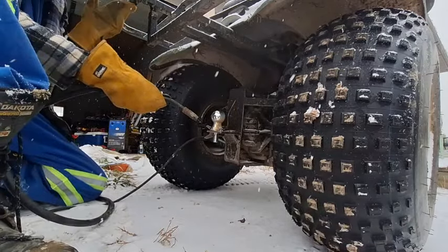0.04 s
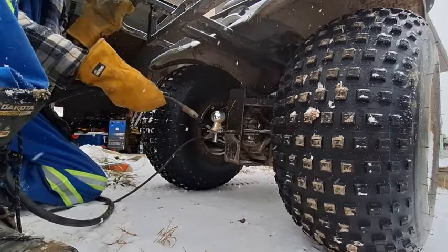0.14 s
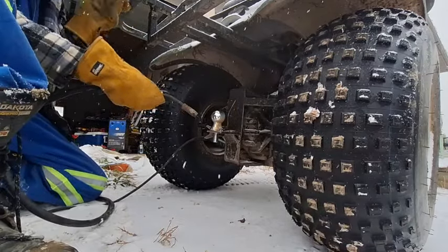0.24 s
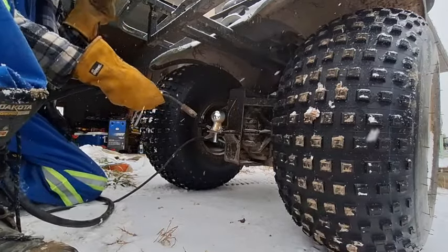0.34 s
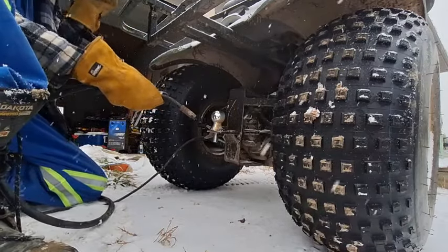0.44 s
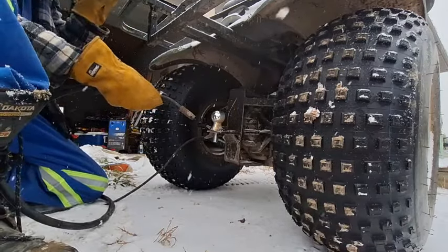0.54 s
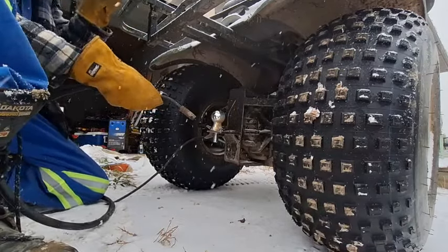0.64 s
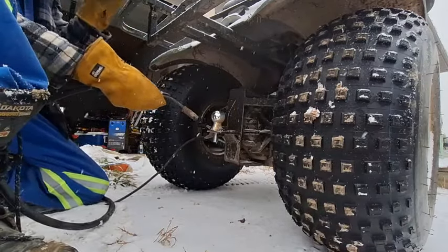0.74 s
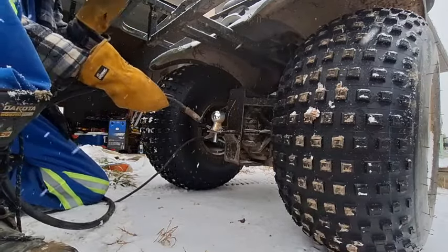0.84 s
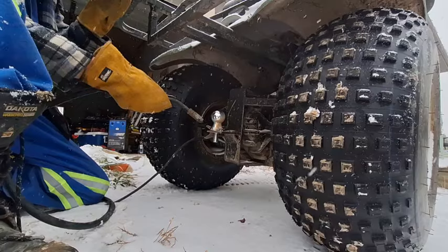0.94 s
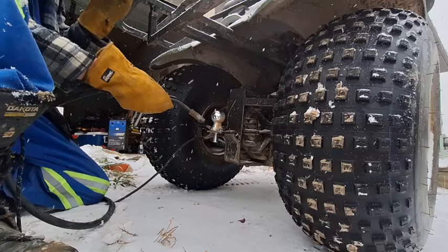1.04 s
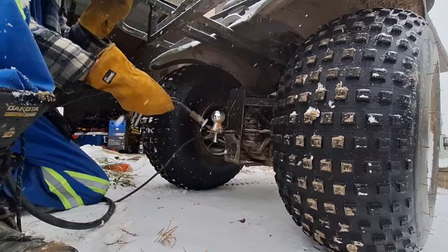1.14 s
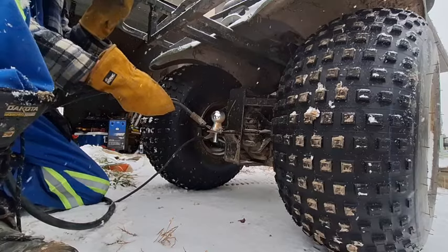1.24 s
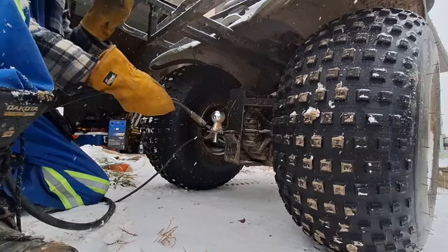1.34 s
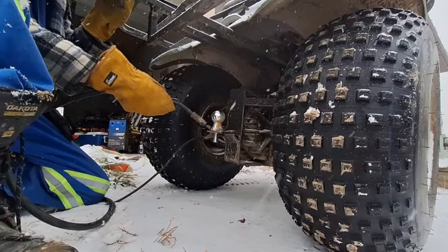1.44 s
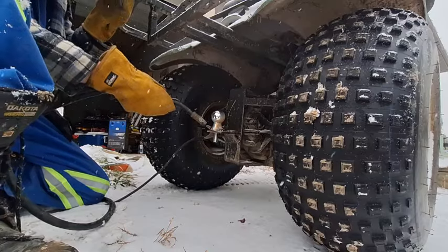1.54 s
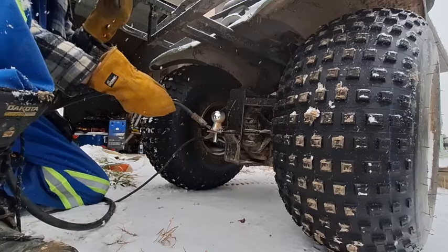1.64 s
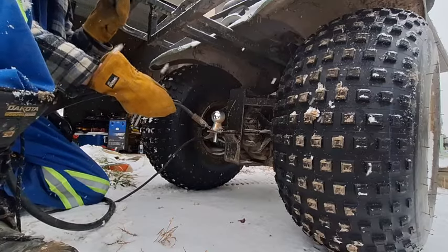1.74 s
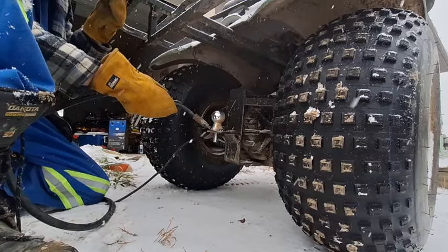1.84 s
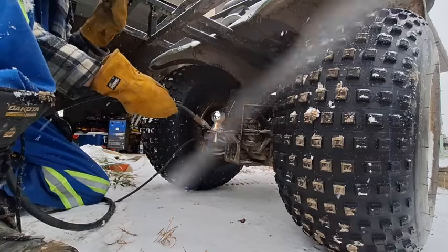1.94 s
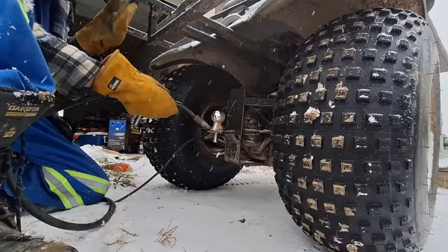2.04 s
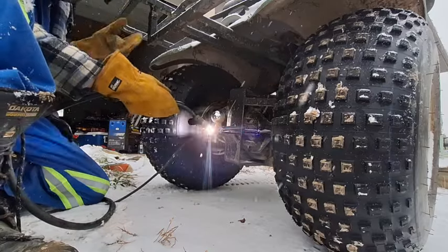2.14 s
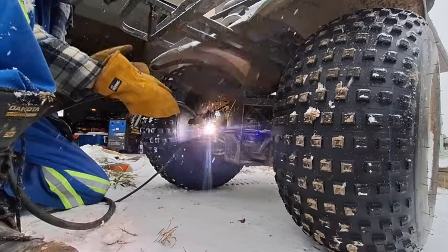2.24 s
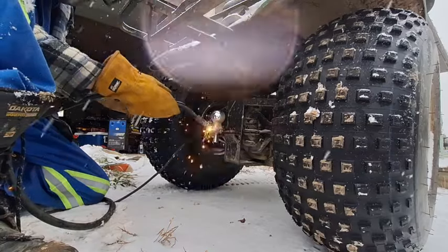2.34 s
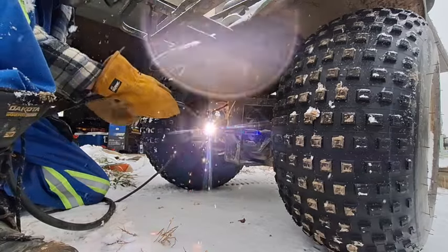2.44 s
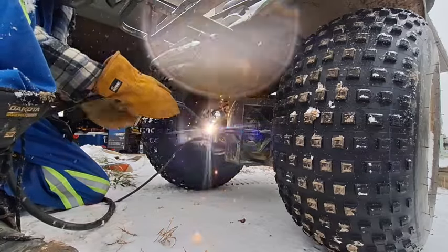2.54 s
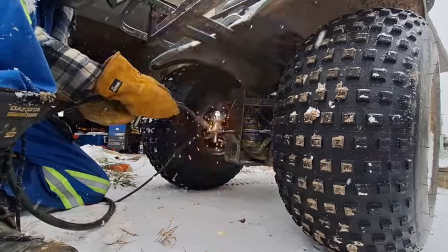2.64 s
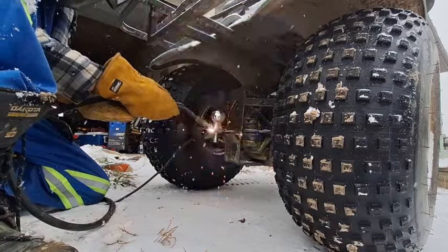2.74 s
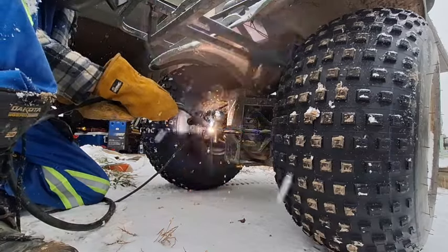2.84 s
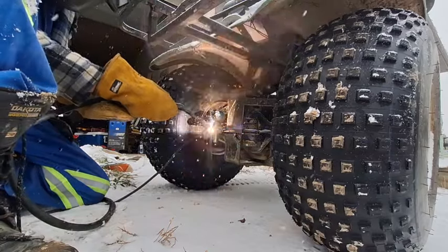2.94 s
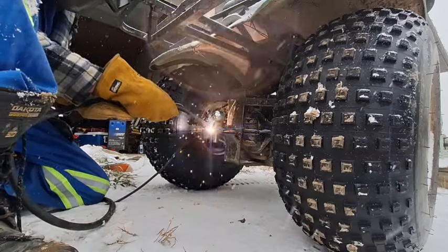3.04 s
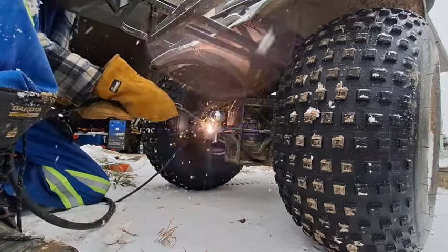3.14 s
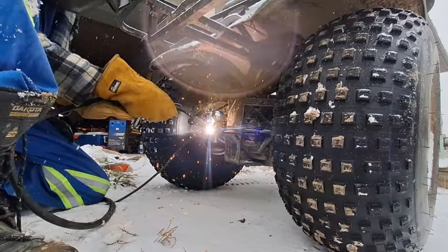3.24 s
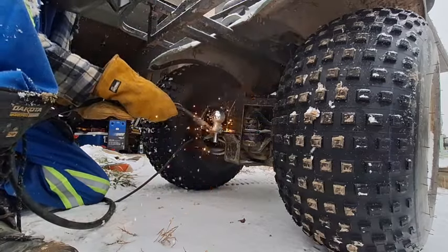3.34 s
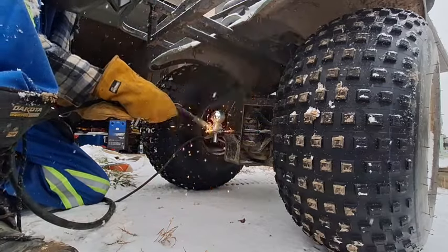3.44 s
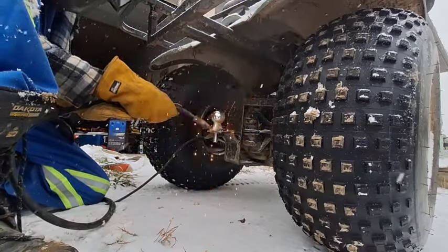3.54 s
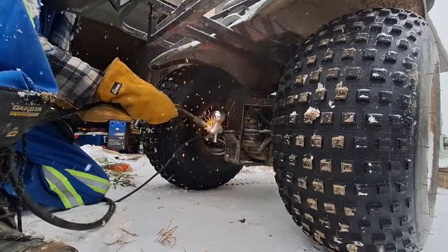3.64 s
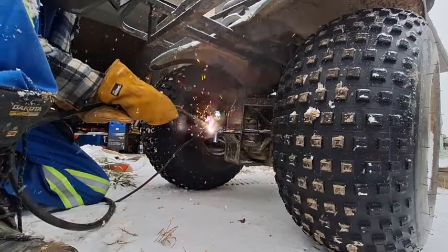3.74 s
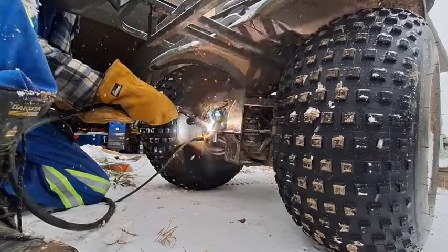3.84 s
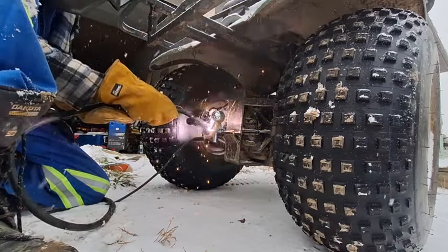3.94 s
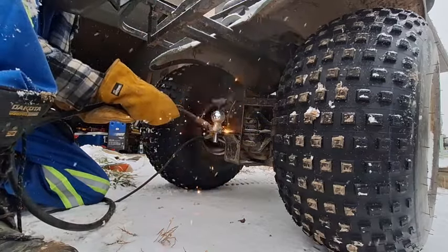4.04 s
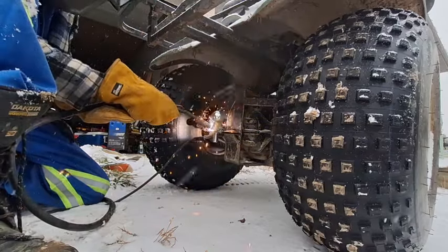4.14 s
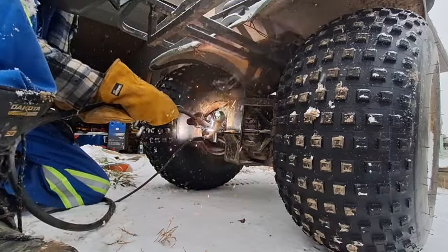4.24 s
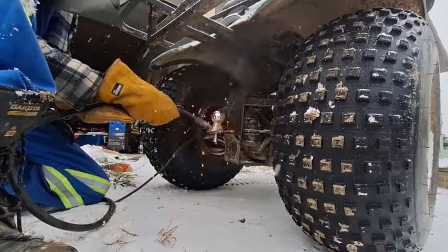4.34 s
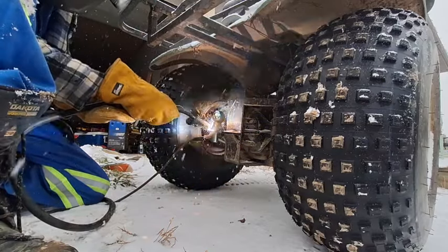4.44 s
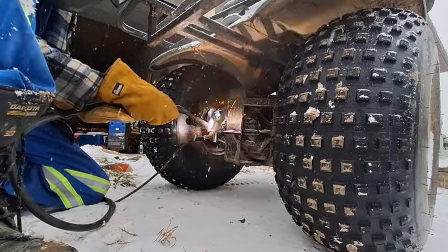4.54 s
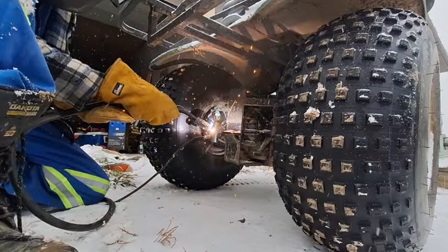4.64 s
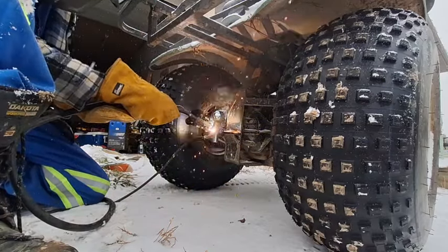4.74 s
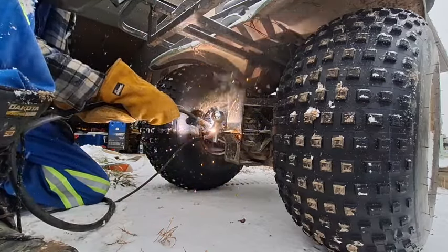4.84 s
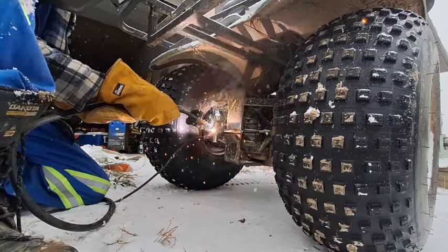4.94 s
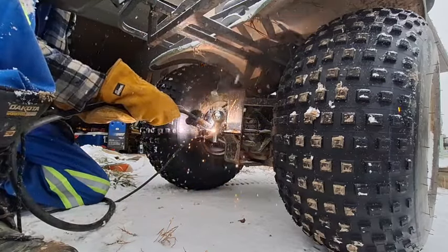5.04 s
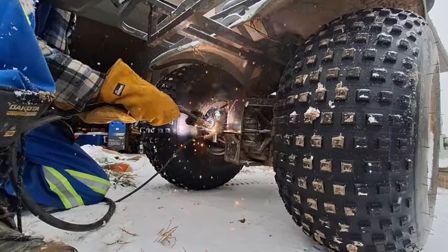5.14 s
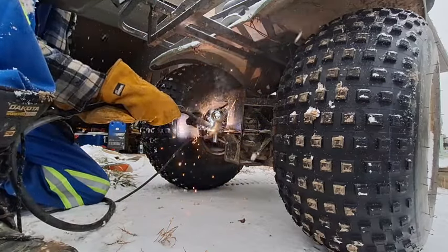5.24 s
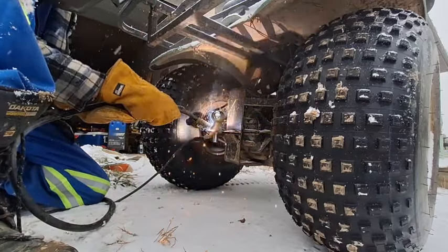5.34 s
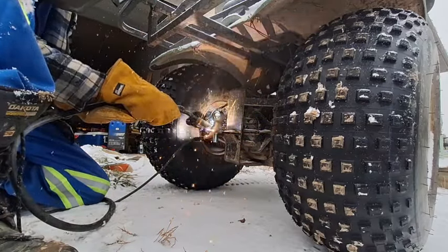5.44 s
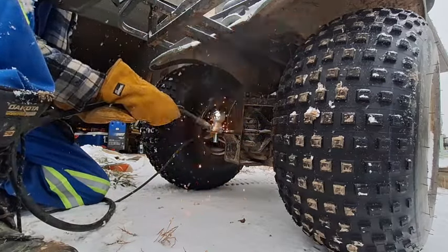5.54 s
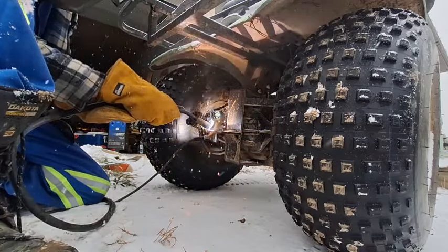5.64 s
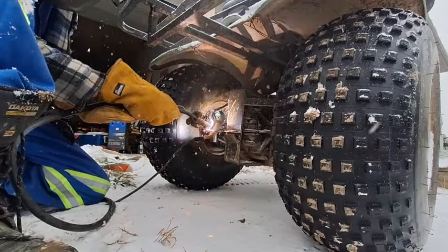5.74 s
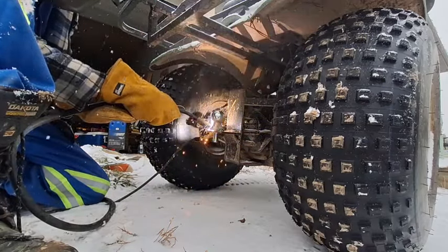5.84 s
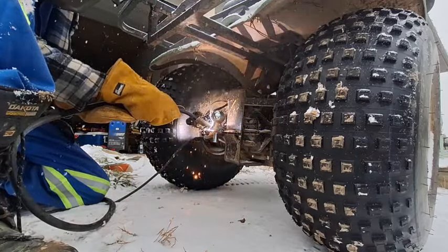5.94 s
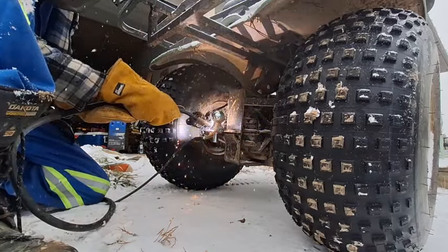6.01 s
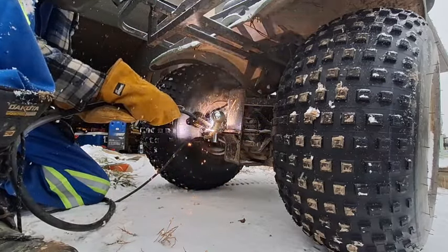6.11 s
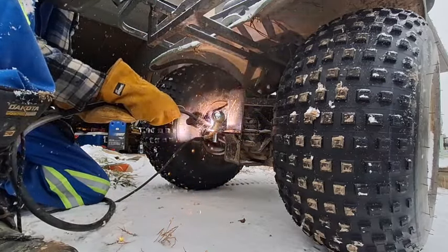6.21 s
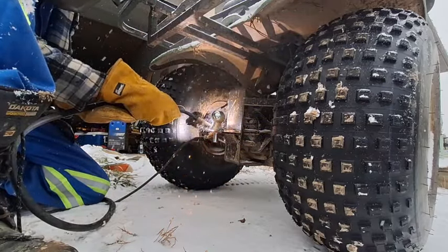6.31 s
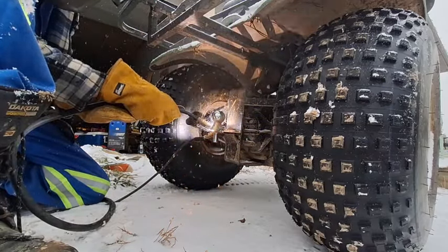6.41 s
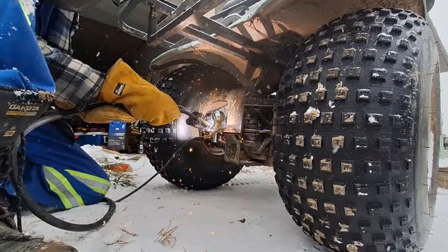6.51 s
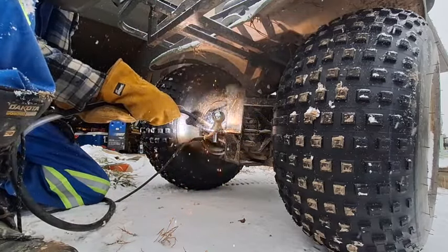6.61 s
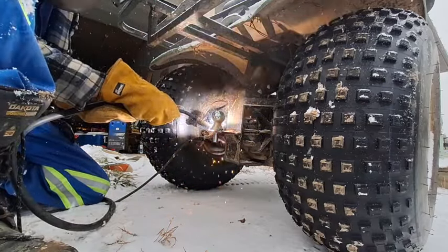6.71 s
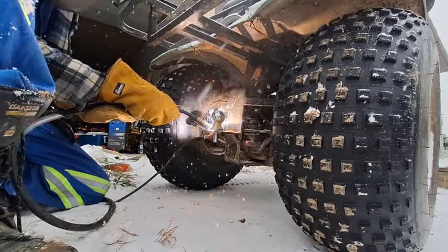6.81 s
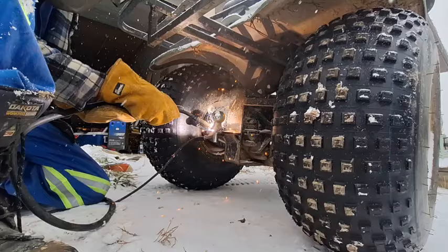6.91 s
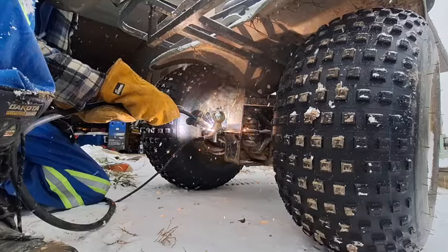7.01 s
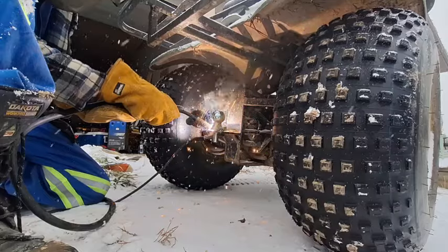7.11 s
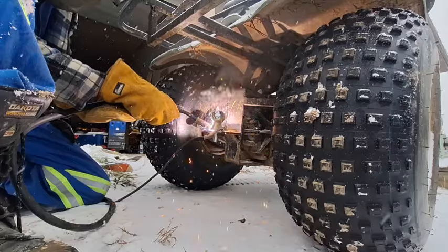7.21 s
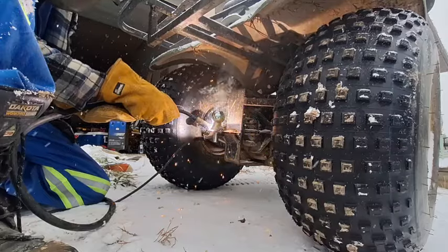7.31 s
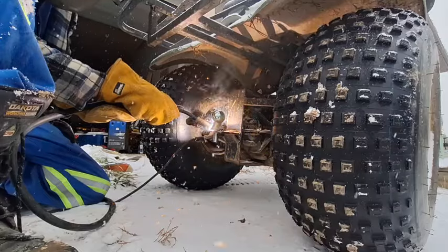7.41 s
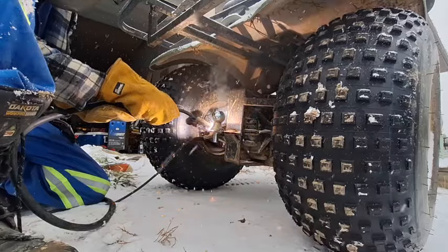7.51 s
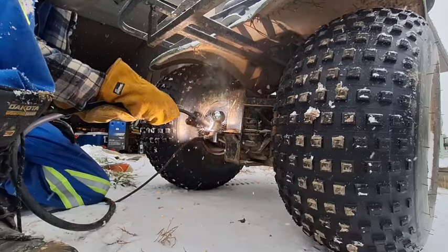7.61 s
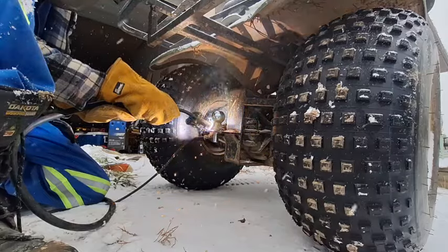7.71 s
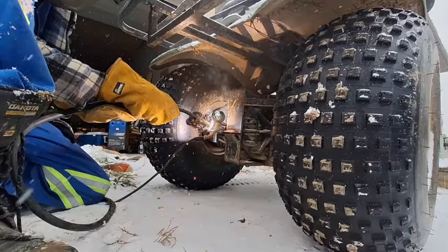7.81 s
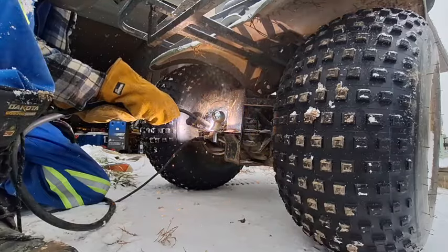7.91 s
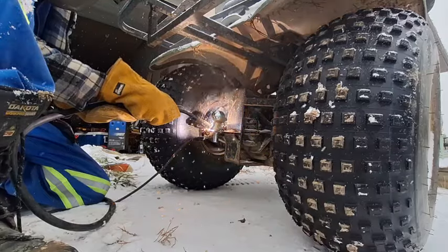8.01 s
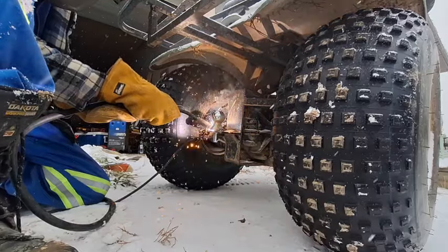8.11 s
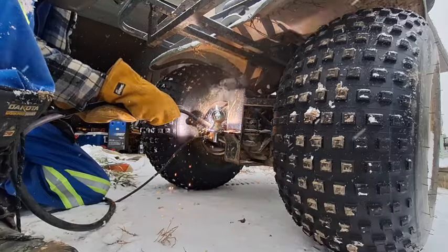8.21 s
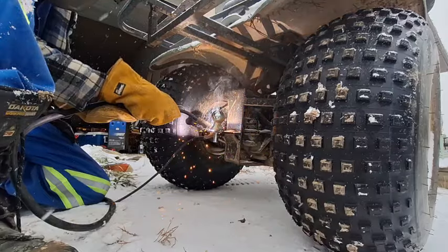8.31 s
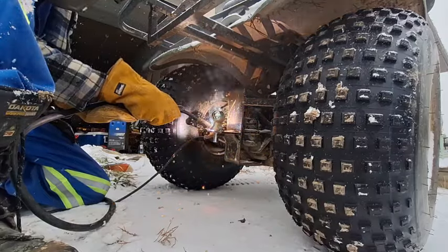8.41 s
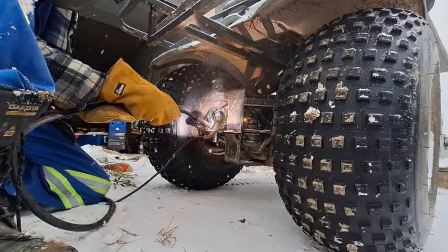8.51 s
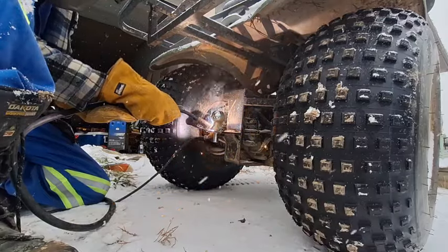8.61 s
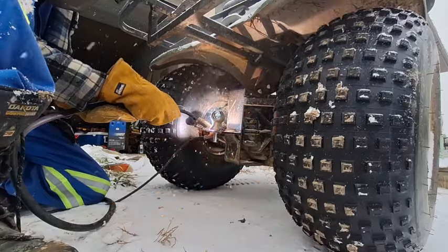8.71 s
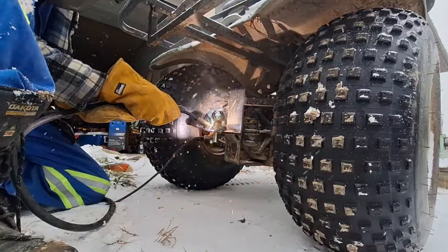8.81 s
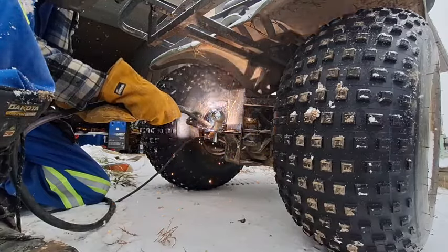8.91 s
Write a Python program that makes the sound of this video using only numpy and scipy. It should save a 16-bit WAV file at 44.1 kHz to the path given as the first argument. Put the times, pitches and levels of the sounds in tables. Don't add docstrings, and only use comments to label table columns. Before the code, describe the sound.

Outdoors on snow, microphones lie on the ground about a metre from the work. From 0 to 1.7 s it is quiet: low distant traffic, dry snow-pellet ticks on a housing, a sleeve rustling at first, and a far engine faintly starting to drone near 0.9 s. At 1.78 s a rod squeaks briefly along steel, then knocks hard at 1.83 s with quick bounces and a short dull ring, followed by faint grit. The arc strikes at 2.17 s and sputters in bright, hissing bursts with sharp snaps, dying and restriking through 4.3 s with small gaps. From 4.47 to 5.5 s it burns unevenly, loud snaps early. After a tiny break it restrikes at 5.6 s and holds to 9 s: harsh sizzling, irregular crackles and a 120-per-second buzz, with tight echoes from axle and tyres and the engine's low drone beneath. It cuts off abruptly.

```python
import sys
import numpy as np
from scipy import signal
from scipy.fft import rfft, irfft
from scipy.io import wavfile
from scipy.ndimage import uniform_filter1d

SR = 44100
rng = np.random.default_rng(int(sys.argv[2]) if len(sys.argv) > 2 else 0)


def to_linear_factor(level_db):
    exponent = np.asarray(level_db, float) / 20
    return 10 ** exponent


def to_wav(sig):
    pcm = np.clip(np.atleast_2d(sig), -1, 1) * 32767
    pcm = np.round(pcm).astype(np.int16)
    wavfile.write(sys.argv[1], SR, pcm.T)


N = 395136
T = np.arange(N) / SR
LEFT_RIGHT = np.array([[1], [-1]])
LEFT_LEAD_SAMPLES = 14

# strike in seconds, death in seconds, first level in dB, last level in dB,
# striking snap in dB.
BURNS = [(2.1734, 2.231, -57, -49, 2), (2.2672, 2.282, -30, -43, -10.5), (2.31, 2.622, -38.5, -34, -4.5),
         (2.7752, 3.299, -32, -44, 2), (3.433, 3.453, -35, -39, 1.5), (3.624, 3.705, -30, -44.5, 3.5),
         (3.717, 3.96, -37.5, -45, 2.5), (3.974, 3.997, -26.5, -36.5, -10), (4.0833, 4.312, -36, -42.5, 2),
         (4.4677, 5.517, -41, -39, -4), (5.5986, 9.0, -32.5, -33.5, -7)]


def band(x, lo_hz, hi_hz):
    sos = signal.butter(2, [lo_hz, min(hi_hz, .45 * SR)], "bandpass", fs=SR, output="sos")
    return signal.sosfilt(sos, x)


def colour(points, size=4096):
    hz, db = np.transpose(points)
    log_hz = np.log(np.fft.rfftfreq(size, 1 / SR) + 1)
    cepstrum = irfft(np.interp(log_hz, np.log(hz), db) * np.log(10) / 20)
    cepstrum[1:size // 2] *= 2
    cepstrum[size // 2 + 1:] = 0
    return irfft(np.exp(rfft(cepstrum)))


def walk(rate_hz):
    hold = int(SR / rate_hz)
    return uniform_filter1d(np.repeat(rng.standard_normal(N // hold + 1), hold), hold)[:N]


def clicks(start_s, size):
    out = np.zeros(N)
    np.add.at(out, np.minimum((np.asarray(start_s) * SR).astype(int), N - 1), size)
    return out


def fade(x, tau_s):
    return signal.lfilter([1], [1, -np.exp(-1 / (tau_s * SR))], x)


def conv(x, h):
    return signal.oaconvolve(x, h)[:N]


def noise(*shape):
    return rng.standard_normal(shape or N)


def town():
    # frequency in Hz, level in dB per Hz.
    spectrum = [(15, -22), (25, -15), (75, 2), (156, -10.5), (281, -6.5), (378, -20), (457, -7),
                (509, -17.5), (826, -12.5), (950, -23), (1020, -23.5), (1380, -28), (1710, -38.5),
                (7300, -56), (8580, -60), (15500, -49)]
    mid, side = (conv(noise(), colour(spectrum, size=16384)) for _ in range(2))
    side = side - 0.51 * signal.sosfilt(signal.butter(1, 250, fs=SR, output="sos"), side)
    bass = signal.sosfiltfilt(signal.butter(2, 800, fs=SR, output="sos"), mid)
    left = mid - bass + np.roll(bass, shift=-LEFT_LEAD_SAMPLES)
    width = (to_linear_factor(-0.5) * side - 0.55 * band(side, 60, 900)) * LEFT_RIGHT
    scale = to_linear_factor(-49) / np.std(band(mid, 74.0, 1100))
    return scale * to_linear_factor(2.3 * walk(5.4)) * ([left, mid] + width)


def engine():
    # time in seconds, firing rate in Hz, level in dB.
    running = [(0.0, 73.7, -62), (0.1, 69.6, -71), (0.52, 75.4, -66), (0.57, 80, -67), (0.8, 82, -61),
               (0.92, 92.7, -49), (1.02, 81.3, -55.5), (3.42, 80.1, -39), (5.34, 77.04, -34),
               (5.56, 77.3, -40), (6.46, 77.2, -43), (6.76, 70, -44), (6.89, 74.7, -39.5),
               (7.66, 74.8, -33), (7.88, 73.6, -35.5), (8.96, 73.2, -34.5)]
    s, hz, db = np.transpose(running)
    db = np.interp(T, s, db)
    firing_hz = np.interp(T, s, hz) * (1 + .012 * walk(12))
    firing = np.sin(2 * np.pi * np.cumsum(firing_hz) / SR)
    rumble = to_linear_factor(-23.0 + 0.24 * (db + 28)) * band(noise(), 25, 65)
    rumble += to_linear_factor(-23.0 - ((T - 2.5) / 0.12) ** 2) * band(noise(), 240, 370)
    rumble += to_linear_factor(-13.5 - ((T - 3.75) / 0.052) ** 2) * band(noise(), 50.0, 178)
    whine_hz = 263.5 + 1.66 * walk(9)
    whine = to_linear_factor(-53.5 + 1.5 * walk(6.7)) * np.sin(2 * np.pi * np.cumsum(whine_hz) / SR) * (T > 4.2)
    return to_linear_factor(db - 1.0 + 2.24 * walk(13)) * firing + whine + rumble


def ticks():
    # start in seconds, click in dB, ring frequency in Hz, ring in dB.
    pellets = [(0.0633, -58, 3060, -64), (0.0727, -50, 2920, -60), (0.288, -50, 2290, -58),
               (0.3012, -49, 2220, -53), (0.3434, -45, 3460, -72), (0.5217, -54, 1840, -75),
               (0.579, -62, 2090, -56), (0.6868, -56, 1820, -60), (0.74, -55, 1970, -78),
               (0.7961, -58, 2690, -62), (0.958, -46, 2170, -49.5), (1.284, -58, 2230, -48.5),
               (1.3703, -48, 2610, -64), (1.5006, -47, 2336, -76), (1.572, -51, 1820, -73),
               (1.6347, -54, 1940, -68), (1.709, -47, 1950, -63), (1.9, -50, 3520, -60),
               (2.0385, -40.5, 1830, -68), (0.62, -62, 2300, -60), (0.65, -64, 2600, -61),
               (1.0395, -61, 2000, -76), (2.119, -40, 2036, -48), (2.7028, -57, 2380, -52),
               (2.7306, -53, 1960, -56)]
    out = np.zeros((2, N))
    t = T[:3000]
    for s, click_db, hz, ring_db in pellets:
        burst = to_linear_factor(click_db - 6.0 - 60 * t / 0.01) * band(noise(len(t)), 4300, 10000)
        burst += to_linear_factor(ring_db + 4.0 - 60 * t / 0.07) * band(noise(len(t)), hz / 1.4, hz * 1.2)
        i = int(s * SR)
        out[:, i:i + len(t)] += burst * to_linear_factor(9.9 * rng.uniform(-1.2, 1) * LEFT_RIGHT)
    t = T[:SR // 2]
    rustle = to_linear_factor(-56) * np.exp(-(t / 0.19) ** 4) * band(noise(len(t)), 2560, 3260)
    rustle = rustle + to_linear_factor(-68.0) * np.exp(-(t / 0.39) ** 6) * band(noise(2, len(t)), 1900, 17000)
    stirs = sum(np.exp(-((T - s) / 0.075) ** 2) for s in (.66, 1.5, 1.98))
    cloth = to_linear_factor(-69.5) * stirs * band(noise(2, N), 2500, 8400)
    return out + cloth + np.pad(rustle, ((0, 0), (0, N - len(t))))


def rod():
    # start in seconds, peak in dB.
    knocks = [
        (1.8265, -15.5),
        (1.8279, -10),
        (1.838, -20),
        (1.8397, -32),
        (1.8455, -21),
    ]
    # frequency in Hz, level in dB, 60 dB decay time in seconds.
    frame = [(465, 6.5, 0.18), (620, 4.5, .05), (800, 1, 0.097), (1270, -27, 0.1), (1700, -3, 0.14),
             (1780, 13.5, 0.029), (2900, -13, 0.15), (2920, 1.5, 0.05), (3900, 3.5, 0.04),
             (5000, -37, 0.17), (5650, -37, 0.11), (6000, 16, 0.0074), (6660, -18, 0.038)]
    s, db = np.transpose(knocks)
    t = T[:SR // 4]
    ring = sum(to_linear_factor(d - 60 * t / min(t60, .12)) * np.sin(2 * np.pi * hz * t) for hz, d, t60 in frame)
    blows = clicks(s, to_linear_factor(db))
    rattle = fade(blows, 0.0037) + to_linear_factor(-36.0) * fade(blows, 0.037)
    rattle = rattle + to_linear_factor(-53.5) * (abs(T - 1.88) < 0.035) + to_linear_factor(-58.5) * (abs(T - 1.97) < 0.07)
    rattle = rattle * np.array([band(noise(), 1200, 3850) + to_linear_factor(-17.0) * noise() for _ in range(2)])

    scrape = noise()
    drag_s, drag_db = [1.776, 1.782, 1.796, 1.8, 1.824, 1.826], [-34, -10, -7, -9, -30, -66]
    drag = to_linear_factor(np.interp(T, drag_s, drag_db, left=-90))
    squeak = band(band(scrape, 2050, 2600), 1900, 2440) + to_linear_factor(-29) * band(scrape, 2500, 8500)
    squeak = drag * squeak
    thump = to_linear_factor(-40) * np.exp(-((T - 2.142) / 0.019) ** 2) * np.sin(2 * np.pi * 430 * T)
    grit = to_linear_factor(-64) * np.exp(-((T - 1.95) / 0.074) ** 4 + 0.3 * walk(40))
    grit = grit + to_linear_factor(-63) * np.exp(-((T - 1.9) / 0.0095) ** 2)
    grit = grit * band(noise(2, N), 6000, 17000)
    knock = band(blows, 100, 330) + to_linear_factor(-18.5) * conv(blows, ring) + to_linear_factor(4.5) * rattle
    return grit + thump + knock + to_linear_factor(-14.0) * squeak


def burning():
    # centre in seconds, half-length in seconds,
    # arc change in dB, extra hum in dB.
    surges = [(2.173, 0.15, 9, 17), (2.401, 0.027, 7.5, 17), (2.548, 0.031, -6.5, -8),
              (2.61, 0.052, -4.5, 6), (2.934, 0.048, 4.5, -9), (3.06, 0.12, -1.5, -8), (3.18, .11, 12, 12),
              (3.421, 0.035, 18.5, 10), (3.659, 0.019, -24, 4), (3.669, 0.015, 18, 19),
              (3.8, 0.097, 6.5, 4), (4.3, 0.024, -0.5, -8), (4.48, 0.089, 9, 19.5), (4.617, 0.0078, -11, 8),
              (4.645, 0.017, 7, 5.5), (4.753, 0.039, -17.5, 0), (4.792, 0.16, 12.5, 9.5),
              (4.965, 0.048, 10, 0), (5.047, 0.029, 5.5, 2), (5.21, 0.13, 9, 6), (5.587, 0.02, 26, 15),
              (6.04, 0.098, 1, 5.5), (6.22, 0.082, -8, -7), (6.327, 0.044, 2.5, 4), (6.71, 1, 3.5, 5.5),
              (7.471, 0.07, -10.5, 0), (8.137, 0.12, -6, -10), (8.414, 0.092, -5, -5), (8.46, 0.033, 9, 0),
              (8.556, 0.29, -1, 0)]
    dying_db_per_s, hum_lag_s = 1503, 0.021
    lit_db = np.where(T > 2.118, -67.5, -120.)
    for on, off, first_db, last_db, _ in BURNS:
        levels_db = [first_db, last_db, last_db - dying_db_per_s]
        lit_db = np.maximum(lit_db, np.interp(T, [on, off, off + 1], levels_db, left=-120))
    swing = [np.clip(1 - abs(T - s) / half_s, 0, 1) for s, half_s, _, _ in surges]
    burn_db, extra_db = np.transpose(surges)[2:] @ swing
    burn_db = burn_db + lit_db
    slow_db = 20 * np.log10(fade(to_linear_factor(burn_db), hum_lag_s) / (hum_lag_s * SR) + 1e-6)
    return burn_db, -45.5 + 0.36 * (slow_db + 34.5) + extra_db


def arc():
    # start in seconds, strength in dB.
    restrikes = [(2.16, -17), (2.21, -3.5), (2.3534, -5.5), (2.3683, -5.5), (2.3873, 0.5), (2.454, -23),
                 (2.784, 1.5), (2.7913, 2), (2.809, -0.5), (2.8492, -3), (2.8922, -7), (2.9603, -5),
                 (3.1588, -7), (3.1694, 0), (3.1835, 3.5), (3.6668, -4.5), (3.7848, 2), (3.8253, 0.5),
                 (3.9253, -6), (4.0938, -0.5), (4.0998, 1), (4.1087, -3), (4.116, -3.5), (4.1428, -1),
                 (4.159, 0.5), (4.1757, -3), (4.1848, -4.5), (4.2927, -5),
                 (4.51, 7), (4.5947, 1.5), (4.6675, -1), (4.784, 2), (4.9665, -10), (5.0246, -6.5),
                  (5.1431, -7.5), (5.183, -2.5), (5.2, -2), (5.2181, -0.5), (5.2621, -1.5), (5.3106, -5),
                  (5.3443, -6), (5.429, -5), (5.4529, -6), (4.5754, -12), (4.927, -8), (5.0619, -8.5),
                  (5.085, -7), (5.3947, -10.5), (5.504, -13), (4.2022, -5.5), (4.32, -10.5), (3.687, -5),
                  (3.3985, -23.5), (3.8934, -14), (5.294, -9), (5.462, -8), (5.4928, -10),
                 (2.197, -12), (2.42, -8), (2.452, -17), (2.4604, -10), (2.507, -11), (2.5442, -9),
              (2.6186, -30), (2.8687, -26), (2.903, -7), (2.917, -16), (3.006, -11), (3.0196, -16),
              (3.044, -25), (3.07, -12), (3.0771, -11.5), (3.1018, -13), (3.1169, -5.5), (3.15, -1),
              (3.142, -6), (2.395, -6), (2.399, -9), (3.2, -20), (3.245, -20), (3.283, -33), (3.295, -34),
              (3.7766, -10), (3.801, -1), (3.8155, -2), (3.8389, -12), (3.876, -9), (3.9038, -12),
              (3.9155, -18), (3.9957, -20), (4.2431, -13), (4.254, -22), (4.499, -3), (4.5687, -11),
              (4.5848, -12), (4.627, -14), (4.6348, -13), (4.6704, -8), (4.7613, -29), (4.769, -19),
              (4.7764, -15), (4.8607, -13), (4.871, -15), (5.044, -14), (5.077, -23), (5.159, -16),
              (5.2277, -20), (5.2512, -18),
                 (5.6573, -5), (5.6843, 3), (5.7196, -8), (5.7937, -8), (5.8025, -21), (5.8266, -21),
            (5.8607, -4), (5.9416, -4.5), (5.9541, -6), (6.01, -17), (6.0193, -5), (6.0511, -8),
            (6.0617, -3), (6.094, -2.5), (6.1096, -7.5), (6.1266, -3.5), (6.194, -3), (6.237, -6.5),
            (6.2852, -8), (6.2941, -9), (6.3026, -9), (6.3119, -7), (6.3255, -6), (6.3423, -8),
            (6.3693, -14), (6.379, -21), (6.3917, -14), (6.4198, -4.5), (6.4363, -2), (6.4537, -8.5),
            (6.4845, -16), (6.4936, -23), (6.5432, -14), (6.562, -31), (6.5687, -12.5), (6.595, -11),
            (6.634, -19), (6.6518, -25), (6.669, -25), (6.6841, -22), (6.7266, -11), (6.742, -3),
            (6.7507, -11), (6.7755, -15), (6.7849, -9), (6.8105, -20), (6.8688, -4), (6.936, -5),
            (6.9441, -9), (6.977, -6), (6.9859, -15), (7.002, -11), (7.0922, -4.5), (7.1201, -4),
            (7.1282, -6.5), (7.1605, -10), (7.1765, -1.5), (7.1863, -3.5),
                 (7.2186, -5), (7.244, -2), (7.2677, -2), (7.2783, -8), (7.336, -8), (7.3443, -9),
                (7.5435, -16), (7.552, -4.5), (7.6219, -2), (7.644, -2), (7.676, -3), (7.684, 1),
                (7.692, -0.5), (7.7267, -5), (7.7435, -8), (7.7934, -12), (7.8181, -3.5), (7.835, -1),
                (7.8615, -9), (7.8778, -8.5), (7.8867, -7), (7.893, -21), (7.9108, -8), (7.9508, -10),
                (7.9672, -4.5), (7.9935, -5), (8.0445, -8), (8.052, -6), (8.0618, -5), (8.151, -8.5),
                (8.195, -6.5), (8.237, -8), (8.277, -7), (8.2918, -2.5), (8.3357, -6.5), (8.3609, -1),
                (8.3773, -7), (8.4033, -6), (8.4352, -6.5), (8.4507, -1.5), (8.477, -6), (8.5118, -6),
                (8.5705, -7), (8.584, -8), (8.603, -2.5), (8.621, -11.0), (8.6786, -7.5), (8.7018, -29),
                (8.7117, -2.5), (8.717, -11), (8.735, -13), (8.785, -21), (8.7932, -6), (8.805, -2),
                (8.877, -2.5), (8.887, -6), (8.9189, -1), (8.9462, -4)]
    ripple_hz = 119.96
    burn_db, hum_db = burning()
    turn = 2 * np.pi * ripple_hz * T
    cycle = (ripple_hz * T + 0.69).astype(int)
    chance = noise(cycle[-1] + 1, 4)
    throb = 0.24 + .5 + .5 * np.cos(turn + 0.023)
    throb = throb * to_linear_factor(burn_db + 2.0 + 2.0 * chance[cycle, 0] + 0.16 * walk(18))
    strikes = [(row[0], row[4]) for row in BURNS]
    when_s, peak_db = np.transpose(restrikes + strikes)
    snaps = clicks(when_s, to_linear_factor(peak_db))
    gas = throb + to_linear_factor(-26.5) * fade(snaps, .0024)

    start_s = (np.arange(len(chance)) - .2 + .08 * chance[:, 1]).clip(0) / ripple_hz
    small = to_linear_factor(burn_db) * clicks(start_s, to_linear_factor(14 + 2.8 * chance[:, 2].clip(max=1.6)))
    small = to_linear_factor(-10) * small + to_linear_factor(7.0) * band(small, 457, 3430)
    bright = np.clip(0.066 + 0.5 * walk(17), -.6, .9)
    spatter = to_linear_factor(3.3 * rng.exponential(size=N) - 6.0)
    crackle = to_linear_factor(-3.5) * gas * noise() * spatter
    crackle = crackle - bright * np.roll(crackle, 1) + small + snaps

    swell = uniform_filter1d(to_linear_factor(4.0 * chance[cycle, 3]), size=200)
    hum = to_linear_factor(hum_db) * swell * (np.cos(turn + 2.58) + to_linear_factor(-14.5) * np.cos(2 * turn))
    thud = to_linear_factor(6) * band(band(crackle, 79, 355), 79, 355)
    thud = thud + to_linear_factor(3.5) * band(crackle, 376, 572) + to_linear_factor(-5.5) * band(crackle, 220, 430)
    return crackle, gas, hum + thud


def path(echoes):
    h = np.zeros(SR // 100)
    for ms, strength in echoes:
        at = (ms + .03 * rng.uniform(-0.48, 1)) * SR / 1000
        h += strength * to_linear_factor(0.5 - 0.25 * ms) * np.sinc(np.arange(len(h)) - at)
    return h


def vary_bands(x, side):
    # from in seconds, to in seconds, centre in Hz, width in Hz, share removed left,
    # share removed right (negative adds). A row that ends before it begins does nothing.
    band_changes = [(2.7, 2.7, 11700, 1800, 0.95, 0.17), (2.1, 1.8, 9100, 1500, -0.00016, 0.17),
                    (1.3, 3.1, 1336, 270, 0.78, 0.61), (1.8, 2.8, 10550, 280, -0.48, -.8),
                    (2.5, 2.6, 5250, 300, 0.2, -0.93), (2.8, 3.4, 4350, 320, -0.68, 0.01),
                    (1.7, 2.8, 15200, 300, -.6, -.8), (2.2, 3.4, 14000, 560, .3, 0.3),
                    (2.2, 9.1, 4660, 330, 0.44, 1), (5.8, 4.9, 6800, 170, 0.16, 0.31),
                    (4.9, 7.7, 2750, 220, 0.16, 0.19), (4.4, 10, 1623, 134, -0.041, -0.19),
                    (3.4, 9.1, 4230, 167, -0.25, -0.3), (3.7, 4, 1450, 530, 0.35, 0.24),
                    (2.9, 3.8, 2630, 200, 0.93, 0.24), (2.1, 2.62, 3600, 680, 0.86, 0.72),
                    (2.3, 3.35, 4080, 300, -0.082, 0.74), (7.2, 9.5, 500, 1360, 0.27, 0.33),
                    (3, 2.3, 14000, 2200, 0.71, 0.076), (1.4, 3.32, 2750, 300, 1., 1.),
                    (2.8, 4.35, 14100, 1500, 0.26, 0.0037), (4, 4.8, 10900, 2400, .5, 0.14),
                    (6.1, 7.4, 11600, 1200, 0.75, 0.46), (6.6, 9.8, 11100, 1700, 0.7, 0.028),
                    (8.7, 6.6, 11800, 2400, 0.45, -0.11), (3.6, 9.1, 2305, 110, .6, 0.93),
                    (1.6, 8.3, 8200, 370, -0.26, -0.31), (1.5, 6.7, 13300, 370, -0.27, 0.77),
                    (2.1, 11, 14000, 490, 0.3, 0.85)]
    fade_s = 0.012
    for on, off, hz, width_hz, *share in band_changes:
        now = np.clip(np.minimum(T - on, off - T) / fade_s, 0, 1)
        b, a = signal.iirpeak(hz, hz / width_hz, fs=SR)
        x = x - np.clip(share[side], -2, 1) * now * signal.lfilter(b, a, x)
    return x


def scene():
    # delay in ms, signed strength.
    echo_left = [(0.23, -0.39), (0.27, -0.72), (0.39, 0.89), (0.41, 0.67), (0.5, 0.46), (0.68, 1.0),
                 (0.77, -0.87), (0.82, -0.97), (0.84, 0.65), (0.91, -0.99), (1.13, -0.63), (1.22, 0.22),
                 (1.29, -0.45), (1.34, -0.64), (1.45, 0.82), (1.63, -0.7), (1.7, 0.36), (1.79, -0.6),
                 (1.84, 0.38), (1.97, 0.51), (2.13, -0.37), (2.38, 0.44), (2.49, -0.32), (2.59, 0.51),
                 (2.81, 0.64), (2.88, -0.35), (3.06, 0.5), (3.58, 0.38), (3.85, -0.52), (4.38, 0.5)]
    echo_right = [(0.32, -0.28), (0.36, -0.46), (0.48, 0.22), (0.5, 0.44), (0.79, -0.52), (0.84, -0.8),
                  (0.88, -0.27), (1.02, -0.48), (1.16, -1.0), (1.18, 0.77), (1.45, -0.57), (1.52, 0.67),
                  (1.59, 0.4), (1.66, -0.49), (1.79, -0.08), (1.81, -0.59), (1.88, -0.22), (2.15, -0.24),
                  (2.31, 0.35), (2.38, -0.62), (2.61, 0.25), (2.81, 0.45), (2.88, -0.7), (3.22, -0.41),
                  (3.31, 0.03), (4.35, 0.38), (4.4, 0.31), (5.6, -0.24), (5.69, -0.29), (6.62, -0.24)]
    # frequency in Hz, level in dB.
    colour_left = [(600, -20.5), (900, -13.5), (1300, -4.5), (1900, -6.5), (2100, -19.5), (2250, -18),
                   (2500, -14), (2750, -15), (3200, -6), (3800, -12), (4200, -2.5), (4600, -5),
                   (5300, -2.5), (5800, -6.5), (6300, -4.5), (7200, -4), (7700, -12), (8400, -5),
                   (8800, -14.5), (9600, -1.5), (10050, -8.5), (10500, -8.5), (11650, -17.5), (12600, -9.5),
                   (12950, -9), (13350, 0.5), (14000, -17), (14550, -6), (14950, -7), (15350, -5),
                   (15700, -7)]
    colour_right = [(600, -17.5), (900, -21.5), (1300, -9), (1900, -6.5), (2100, -16), (2350, -18),
                    (2750, -18.5), (3200, -11.5), (3800, -14), (4500, -13.5), (5250, -16), (5550, -18),
                    (6200, -12.5), (7200, -19), (8100, -19), (8900, -21.5), (9950, -25), (10800, -12),
                    (12100, -16), (12650, -16), (13500, -7), (14500, -5.5), (15000, -7.5), (15700, -10.5)]
    crackle, gas, low = arc()
    late = np.pad(crackle ** 2, (130, 0))[:N]
    trail = to_linear_factor(-28.5) * np.sqrt(fade(late, 0.0015)) + to_linear_factor(-68.5) * np.sqrt(fade(late, 0.027))
    tyre = to_linear_factor(4) * band(crackle, 1865, 1905)
    place = np.exp(1.26 * np.array([walk(3) for _ in range(3)]))
    place /= np.sqrt(np.sum(place ** 2, axis=0))
    out = []
    sides = ((echo_left, colour_left, -2.5, -1), (echo_right, colour_right, 9.0, 2))
    for side, (echoes, points, db, tyre_db) in enumerate(sides):
        tone = colour([(100, -22.5)] + points + [(17000, -34)])[:512]
        scatter = (to_linear_factor(-11.5) * gas + trail) * noise()
        scatter = scatter - 0.81 * band(scatter, 680, 1770)
        scatter += to_linear_factor(-55.5) * np.sqrt(fade(late, 0.051)) * band(noise(), 820, 4300)
        heard = sum(conv(share * (crackle + scatter), path(echoes)) for share in place)
        out.append(to_linear_factor(db) * vary_bands(conv(heard + to_linear_factor(tyre_db) * tyre, tone), side))
    far = engine()
    low = low + [np.roll(far, shift=-LEFT_LEAD_SAMPLES), far]
    near = np.array(out) + to_linear_factor(1.56 * LEFT_RIGHT) * low + to_linear_factor(-1.8 * LEFT_RIGHT) * rod()
    return near + ticks() + town()


def low_pass(x):
    return signal.sosfilt(signal.butter(12, 17140, fs=SR, output="sos"), x)


def record(dry):
    dry = signal.sosfilt(signal.butter(4, 38, "highpass", fs=SR, output="sos"), dry)
    dry = signal.sosfilt(signal.ellip(8, .2, 32, 15750, fs=SR, output="sos"), dry)
    return low_pass(dry)


dry = scene()
out = record(dry)
to_wav(out)
```